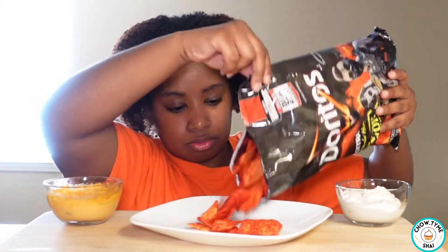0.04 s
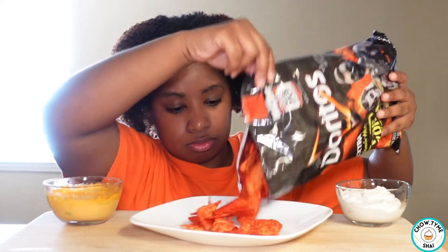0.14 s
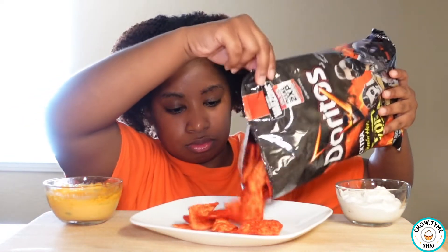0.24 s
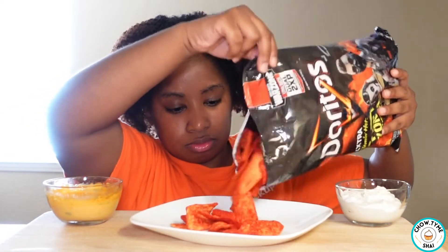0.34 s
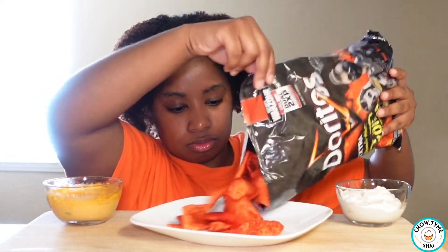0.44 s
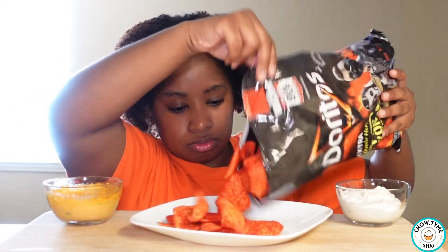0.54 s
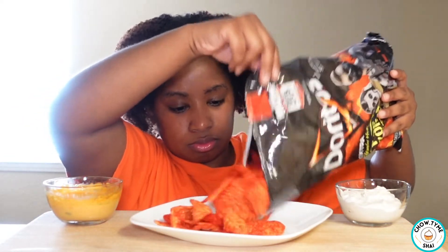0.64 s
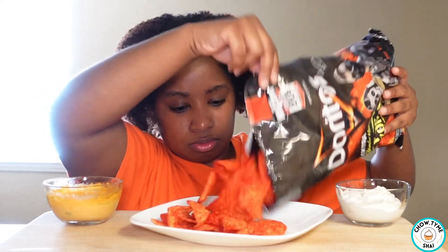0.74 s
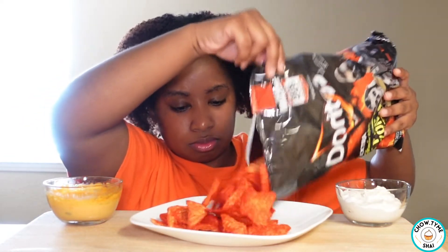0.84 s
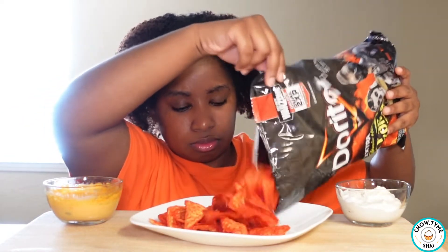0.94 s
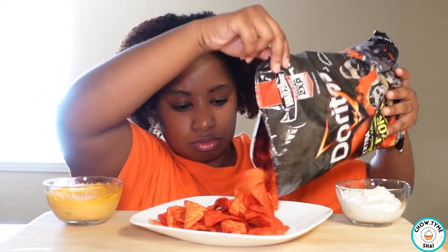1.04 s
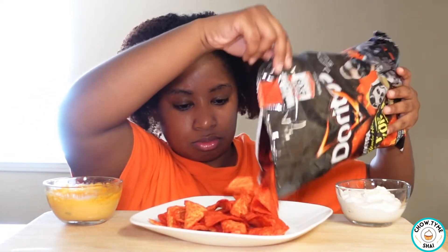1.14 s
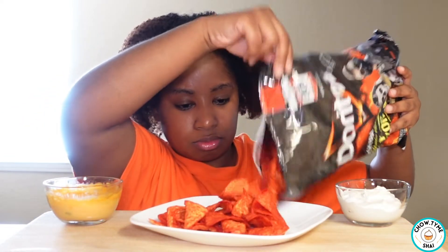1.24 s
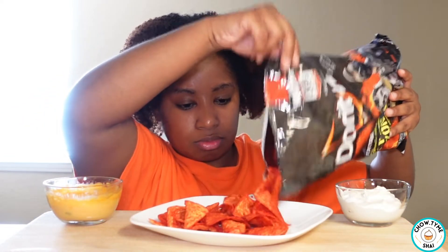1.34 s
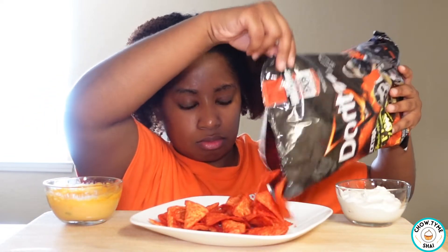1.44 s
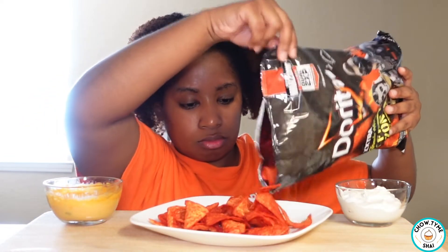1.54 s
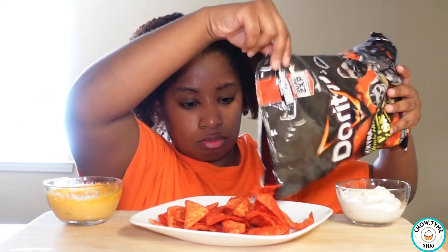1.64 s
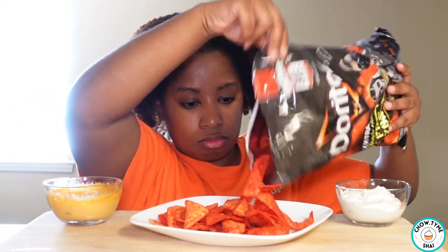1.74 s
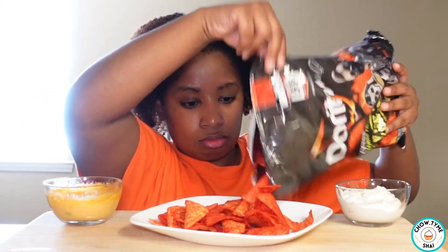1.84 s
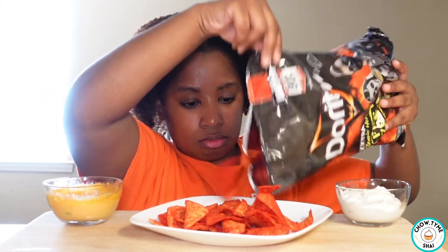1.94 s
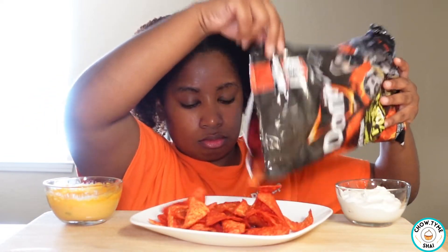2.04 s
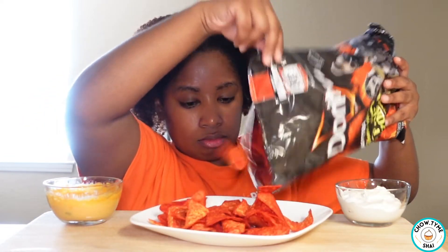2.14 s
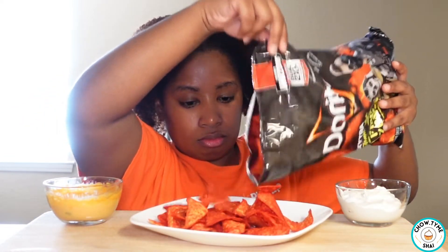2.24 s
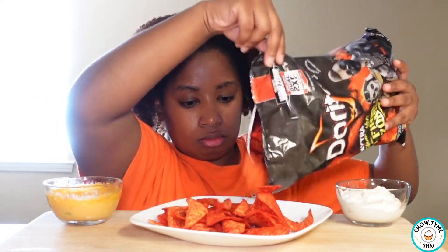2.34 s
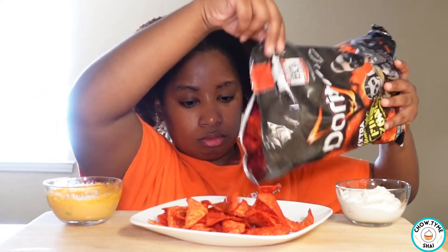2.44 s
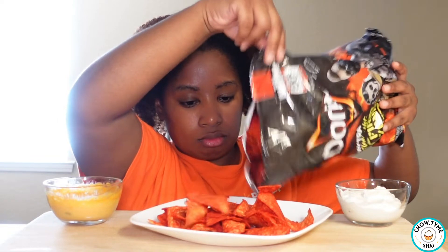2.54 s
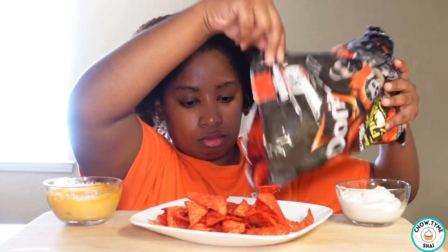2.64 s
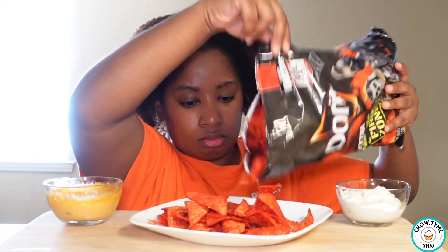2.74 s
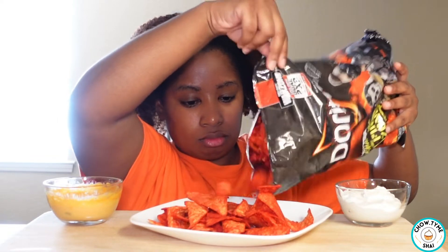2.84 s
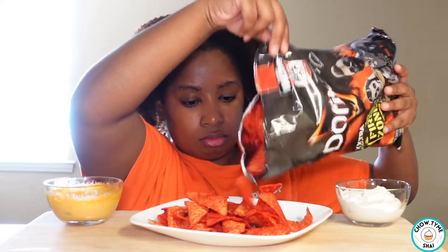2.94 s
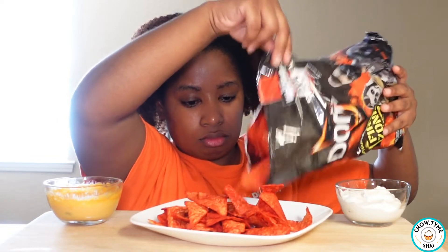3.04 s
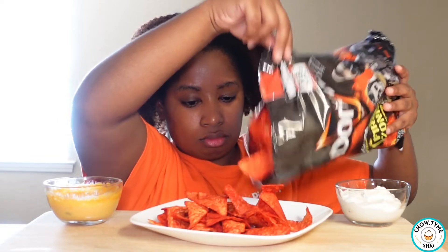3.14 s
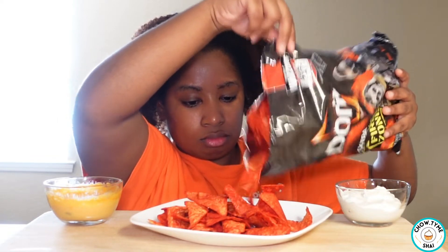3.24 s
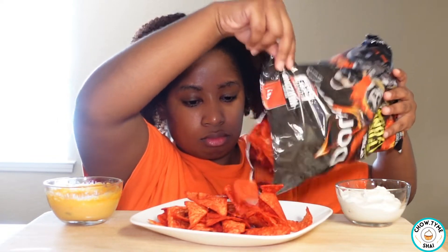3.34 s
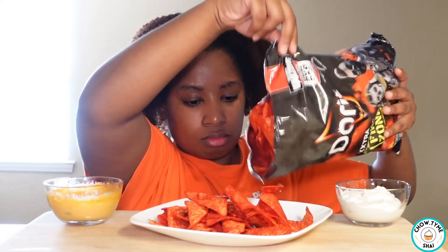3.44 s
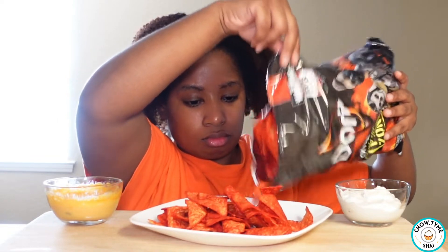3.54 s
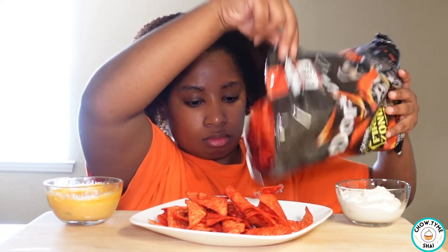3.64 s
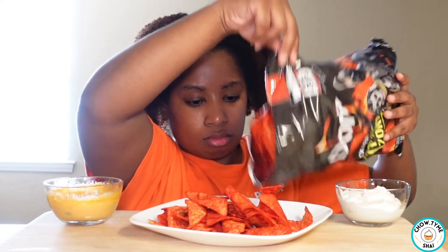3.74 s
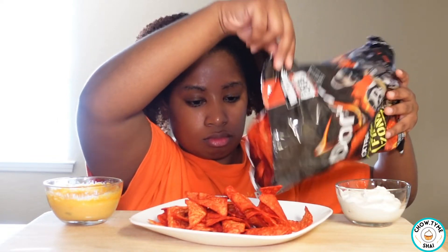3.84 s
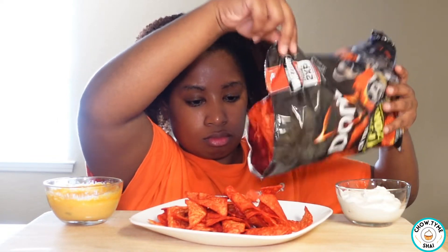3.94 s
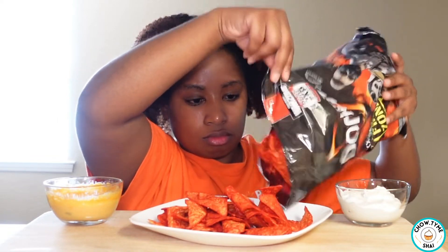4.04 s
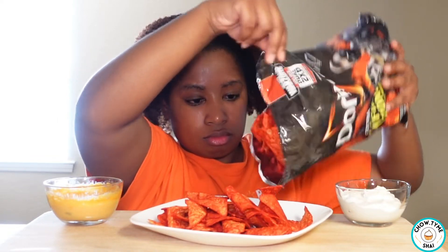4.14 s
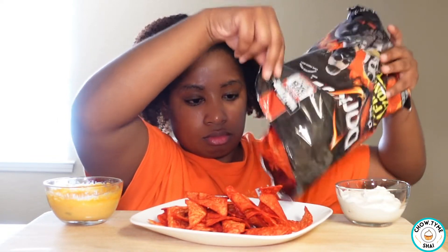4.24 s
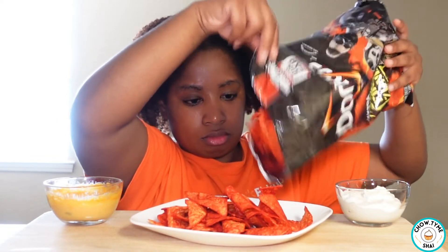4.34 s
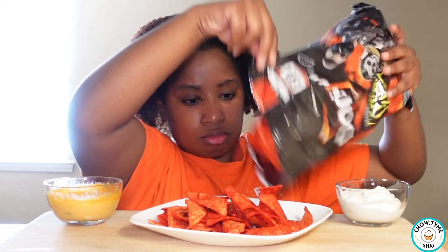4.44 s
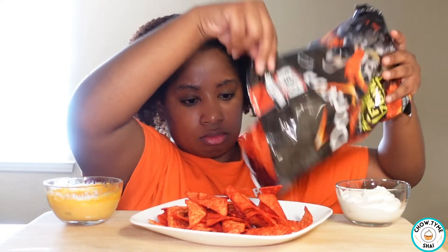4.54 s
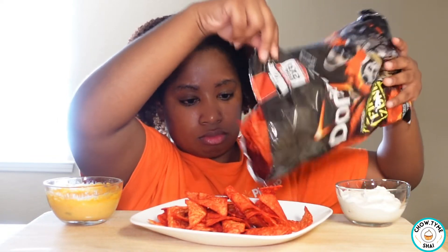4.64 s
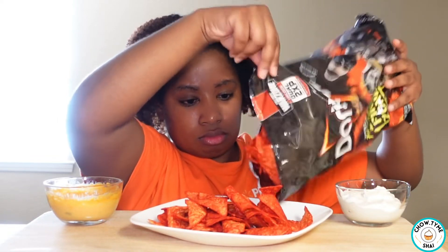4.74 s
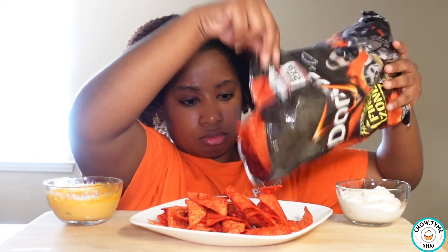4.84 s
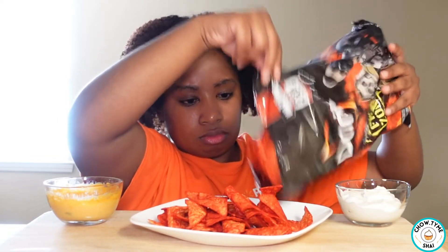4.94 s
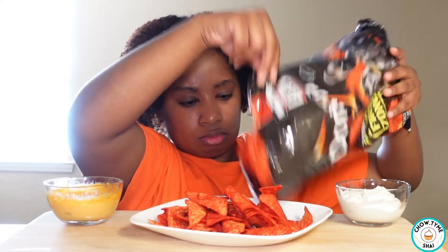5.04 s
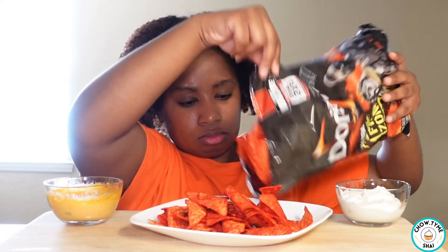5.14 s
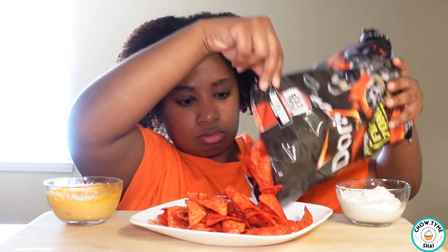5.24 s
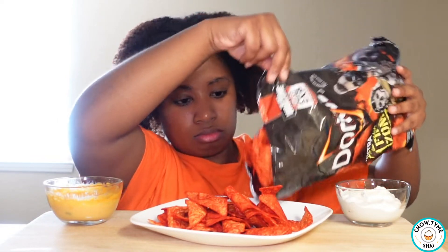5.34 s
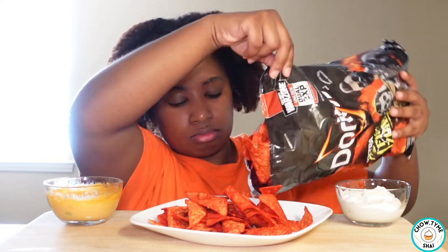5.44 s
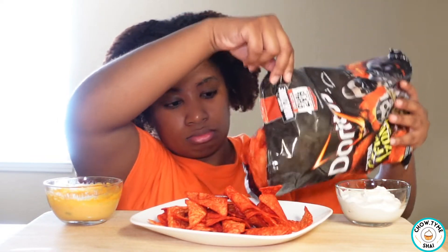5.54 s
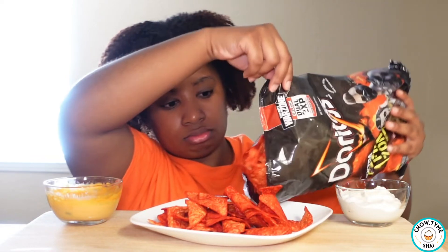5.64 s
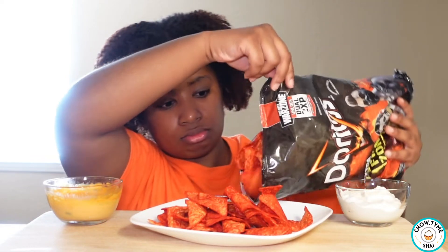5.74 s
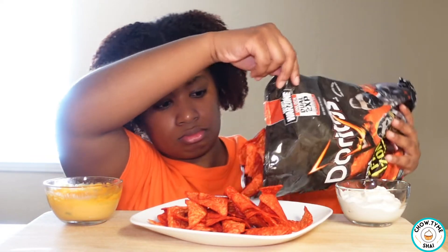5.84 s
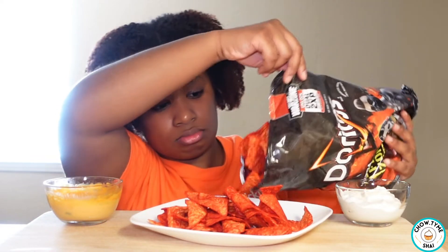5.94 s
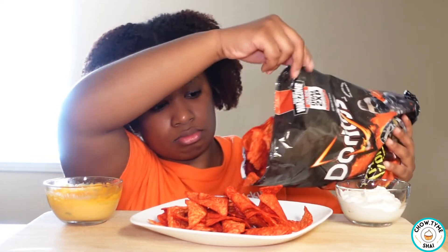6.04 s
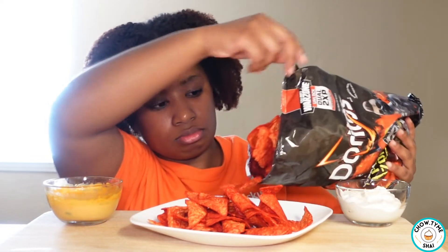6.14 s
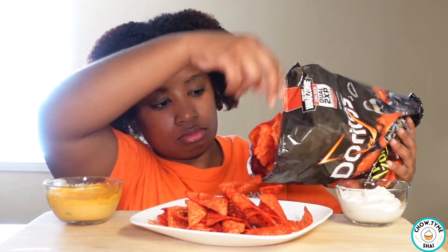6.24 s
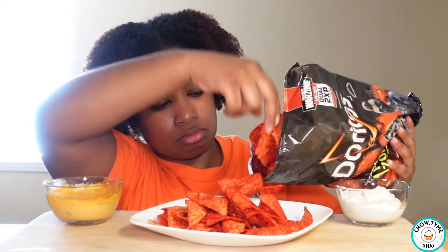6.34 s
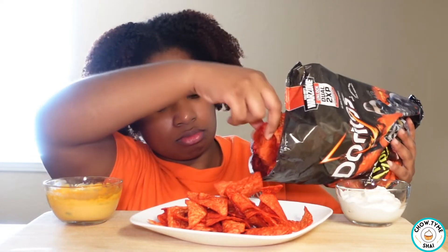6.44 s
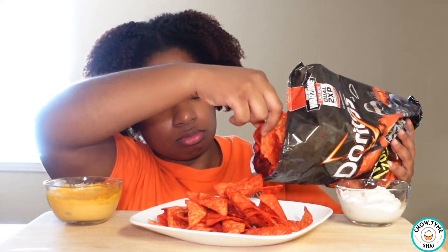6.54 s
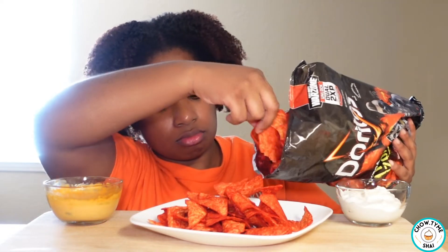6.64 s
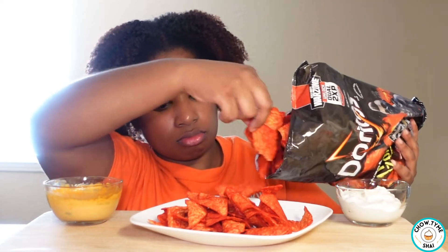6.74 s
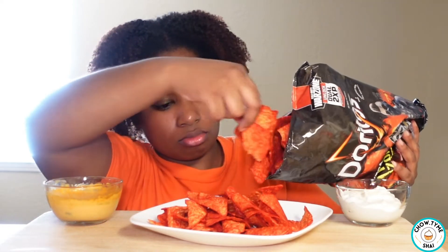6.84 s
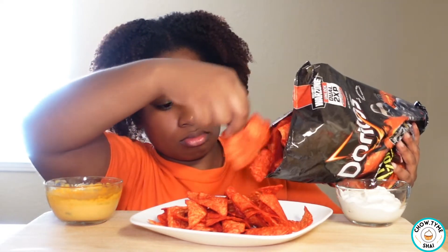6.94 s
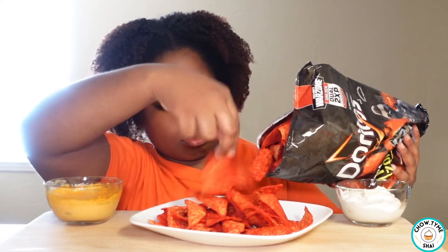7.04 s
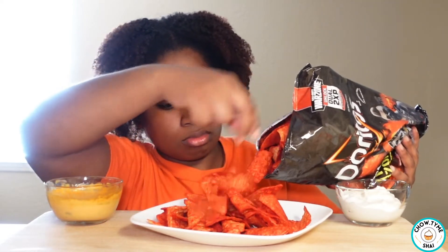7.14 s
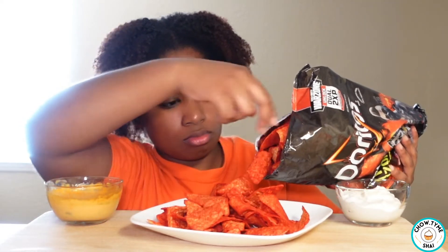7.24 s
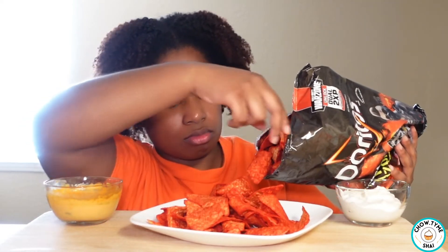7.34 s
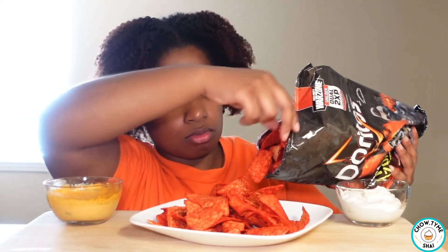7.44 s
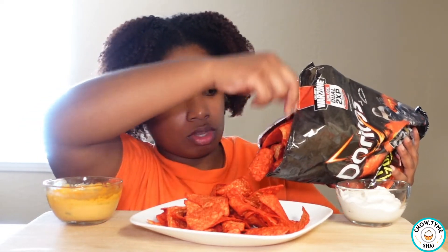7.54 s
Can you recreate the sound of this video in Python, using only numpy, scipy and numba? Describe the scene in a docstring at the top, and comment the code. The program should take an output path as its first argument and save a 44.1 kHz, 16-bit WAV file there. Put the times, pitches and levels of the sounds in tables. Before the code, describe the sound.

Brittle chips clatter out of a crackling snack bag in bursts of shaking, easing off into quieter rustling and short sharp snaps in a small room.

```python
"""A foil snack bag is shaken over a plate in a small room, heard in stereo.
Thousands of tiny decaying rings make the brittle chips rattle, the foil crinkle and the hollow bag boom.
Clusters of rings and sharp cracks make single chips snap and land; short clicks are creases popping.
Five long rings are a chip clinking on a glass bowl. Shaped noise is a fan, a wavering sine a mains hum."""
import sys
import numpy as np
from scipy import signal
from scipy.fft import rfft, irfft
from scipy.io import wavfile
from scipy.ndimage import uniform_filter1d
from numba import njit

SR = 44100
rng = np.random.default_rng(int(sys.argv[2]) if len(sys.argv) > 2 else 0)


def voltage_ratio(level):
    """Linear amplitude factor for a level in decibels (scalar or array-like)."""
    return 10 ** (np.asarray(level, float) / 20)


def master(y):
    """Save y as 16-bit WAV."""
    cut = np.clip(np.atleast_2d(y).T, -1, 1)
    pcm = np.round(cut * 32767)  # scale
    wavfile.write(sys.argv[1], SR, pcm.astype(np.int16))


N = 334057
T = np.arange(N) / SR  # time [s]


def highpass(x, hz, order):
    """Butterworth high-pass: takes away what lies below hz."""
    return signal.sosfilt(signal.butter(order, hz, "high", fs=SR, output="sos"), x)


def unit(x, lo_hz, hi_hz):
    """Scale so that the given band has rms 1."""
    band = signal.sosfilt(signal.butter(2, [lo_hz, hi_hz], "band", fs=SR, output="sos"), x)
    return x / np.sqrt(np.mean(band ** 2))


def shape(points, hz):
    """Gain at the given frequencies, read between (frequency [Hz], level [dB]) points."""
    point_hz, point_db = np.transpose(points)
    return voltage_ratio(np.interp(np.log(hz + 1), np.log(point_hz), point_db))


def walk(rate):
    """Random levels held for 1 / rate seconds, with smoothed steps; spread near 1."""
    hold = int(SR / rate)
    steps = np.repeat(rng.standard_normal(N // hold + 1), hold)
    return uniform_filter1d(steps, hold // 2)[:N]


@njit
def rings(n, start, hz, t60, size, side):
    """Struck objects: decaying sines in mid and side, each cut once it has fallen by 60 dB."""
    out = np.zeros((2, n))
    for k in range(len(start)):
        # multiplying by this each sample turns the phase and shrinks the size
        turn = np.exp(2j * np.pi * hz[k] / SR - np.log(1000) / (t60[k] * SR))
        z = size[k] + 0j
        first = int(start[k] * SR)
        for i in range(max(first, 0), min(first + int(t60[k] * SR), n)):
            z *= turn
            out[0, i] += z.imag
            out[1, i] += side[k] * z.imag
    return out


# colour of the fan noise: (frequency [Hz], level [dB])
FAN = [(25, -14), (45, -14), (60, 6), (85, -16), (120, -2), (170, 6.5), (280, 12), (400, 14), (540, 3),
       (880, 13.5), (1100, 1), (4500, -12), (16000, -30)]
FAN_DB, HUM_DB = -44, -68  # rms in the mid; the hum wavers around its level
HUM_HZ = 120.6


def background():
    """Fan noise, wider in the treble, over a mains hum: a sine that wavers in level."""
    hz = np.fft.rfftfreq(N, 1 / SR)
    width = np.array([1 + 0 * hz, np.clip(0.031 + hz / 2100.0, 0, .42)])
    fan = irfft(rfft(rng.standard_normal((2, N))) * shape(FAN, hz) * width, N)
    fan = fan * voltage_ratio(FAN_DB) / fan[0].std()
    hum = np.sqrt(2) * voltage_ratio(HUM_DB + 2.5 * walk(6)) * np.sin(2 * np.pi * HUM_HZ * T)
    return fan + hum * np.array([[1], [0]])  # the hum is in the mid only


ROOM_T60_S, ROOM_DB = 0.22, -12.5  # decay of the lows, strength of the tail


def room(x):
    """Table-top echo, then a diffuse tail; the swinging bag moves between two spots with own tails."""
    t = T[:SR // 2]
    noise = rng.standard_normal((2, 2, len(t))) * (t > .006)  # spots, mid/side, time
    low = signal.lfilter(*signal.butter(1, 2500, fs=SR), noise)
    high = noise - low
    fall_db = -60 * t / ROOM_T60_S
    low_tail = low * voltage_ratio(fall_db) * np.array([[1], [.4]])
    high_tail = high * voltage_ratio(0.5 * fall_db) * np.array([[1], [.6]])  # the treble falls half as fast
    tail = low_tail + high_tail
    tail = tail * voltage_ratio(ROOM_DB) / np.sqrt(np.sum(tail[0, 0] ** 2))
    swing = 2 * np.pi * 2.5 * T
    spots = np.array([np.cos(swing), np.sin(swing)])[:, None] * x[0]
    table = voltage_ratio(-23.0) * np.roll(x, int(.0031 * SR), axis=1)
    return x + table + signal.fftconvolve(spots, tail, axes=2)[:, :, :N].sum(axis=0)


CLINK_S, CLINK_DB = 2.969, -21
# ringing tones of the glass bowl: (frequency [Hz], level [dB], time to fall by 60 dB [s])
GLASS = [(6290, 6, 0.11), (9900, -11, .06), (11400, 0, 0.13), (12200, -1, 0.15), (13200, -2, .11)]


def clink():
    """A chip strikes the glass bowl, slightly to the right: its tones ring on and die away."""
    hz, db, t60 = np.array(GLASS, float).T
    return rings(N, CLINK_S + 0 * hz, hz, t60, voltage_ratio(db + CLINK_DB), -.1 + 0 * hz)


# lone creases of the foil popping: (time [s], level [dB])
POPS = [(1.3042, -8.3), (1.8429, -6.1), (1.8869, -9.9), (2.0691, -4.6), (2.4087, -5.8), (2.5745, -12.4),
        (2.7627, -8.9), (2.9201, -4.3), (3.238, -9.9), (3.2564, -7.2), (3.8872, -7.1), (3.903, -6.9),
        (4.3015, -7.3), (4.4625, -10.2), (4.4798, -8.8), (4.5898, -7.3), (4.6348, -8.7), (4.718, -8.6),
        (4.801, -8.1), (5.0333, -6.1), (5.1867, -5.5), (5.3342, -7.9), (5.4264, -10.7), (5.5802, -7.9),
        (5.6411, -9.2)]
# what a crease rings with: (frequency [Hz], level [dB], time to fall by 60 dB [s])
POP = [(6000, 2, .0014), (8500, 2, .0014)]


def pops():
    """A crease of foil flips over: very short rings heard as one sharp click."""
    s, db = np.transpose(POPS)
    side = .3 * (2 * rng.random(len(s)) - 1)
    click = np.zeros((2, N))
    for hz, mode_db, t60 in POP:
        click += rings(N, s, hz + 0 * s, t60 + 0 * s, voltage_ratio(db + mode_db), side)
    return highpass(click, 4000, order=2)


SNAP_S = .0057  # time scale of a snap's contacts
SKIRT_DB = 16  # rings at the edge of a snap's range are this much weaker
# loud snaps and landings: (time [s], level [dB], ring [Hz], crack against ring, before fixed trims [dB])
SNAPS = [(.0862, 10, 3030, -34), (.2744, 1, 2830, -3.5), (.3, -2, 2500, -12), (.4076, 10, 3500, -18),
         (.486, 12.5, 5640, -33), (.5327, 7, 2700, -32), (.5944, 12.5, 3240, -30), (.6177, 2, 2750, -11),
         (.6809, 6, 3800, -15), (.6995, 10, 3860, -22), (.849, 10.5, 5530, -25), (.9078, 12.5, 2550, -24),
         (.9534, 9.5, 2390, -27), (1.1048, 7.5, 2580, -23), (1.2239, 10, 2930, -24),
         (1.2892, -0.5, 1580, -4.5), (1.4287, 0, 2860, -9), (1.4685, -1, 1260, -9), (1.4946, 10, 4850, -26),
         (1.531, 7, 3070, -10), (1.5609, 6.5, 1140, -27), (1.6107, 2, 2600, -6.5), (1.6528, 6, 4100, -11),
         (1.6853, 2, 1950, -12), (1.731, 9, 4030, -15), (1.8055, 8, 4160, -14), (1.839, 5, 2800, -12),
         (1.867, 9, 6000, -34), (2.0196, 1, 3240, -29), (2.164, 5.5, 1420, -10), (2.2223, 11, 2870, -15),
         (2.4994, 0, 1480, -2.5), (2.6568, 12, 4700, -22.5), (2.831, 6.5, 1550, -22),
         (2.8588, 6, 1800, -13), (2.967, 8, 6400, -14), (3.024, 13, 3870, -20.5), (3.0608, 10.5, 2520, -29),
         (3.1347, 8.5, 3980, -20.5), (3.1854, 8, 2450, -16), (3.257, 5, 2140, -13), (3.2865, 2.5, 2700, -7),
         (3.344, 10, 825, -17), (3.3784, -7, 2870, -3), (3.5643, 0, 3730, -3.5), (3.625, 8, 4060, -20),
         (3.903, 7.5, 4220, -19), (3.9577, 10.5, 4940, -24), (4.0392, 7, 2930, -11),
         (4.153, 5.5, 1060, -14), (4.2026, 0, 2360, -4), (4.2372, -7, 2330, 3), (4.3006, 5.5, 2450, -13),
         (4.3392, 7, 4250, -26), (4.3644, -6, 3950, -4), (4.56, 6, 2350, -15), (4.6438, 7, 4910, -17),
         (4.7433, 10.5, 2520, -25), (4.829, 8, 1280, -18), (4.9154, 8, 890, -17), (5.0907, 4.5, 2260, -7),
         (5.155, -0.5, 940, -3.5), (5.236, 10.5, 3840, -19), (5.2688, 9.5, 2680, -27),
         (5.3241, -2, 2100, -11), (5.3855, 3, 2180, -14), (5.426, 1, 2200, -23), (5.5043, -3, 3590, -3.5),
         (5.5388, 8.5, 1740, -18), (5.579, 5, 3650, -16), (5.6077, 4, 1640, -16), (5.6404, 3, 4110, -15),
         (5.7015, -3, 2500, -14), (5.7235, 9, 2900, -15), (5.7365, -11, 3030, -8), (5.7671, 2.5, 1970, -6),
         (5.8426, 2, 2050, -15), (5.9324, -5, 3080, -1), (6.0034, 1, 2050, -18), (6.015, -1, 3020, -20),
         (6.0319, 2, 2500, -24), (6.0681, -2, 2020, -18), (6.2434, -2.5, 2200, -7), (6.2821, -7, 1900, -16),
         (6.322, -0.5, 3690, -20), (6.357, 6, 4170, -16), (6.4522, -6, 1290, -14), (6.4941, -8, 2030, -23),
         (6.5221, -3.5, 1430, -14.5), (6.7034, 7, 4430, -15), (6.7991, 7.5, 2950, -30),
         (6.8287, 8.5, 4260, -18), (6.9511, -7, 1760, -22), (6.9965, -1, 3640, -23), (7.043, 4, 2440, -20),
         (7.0585, 11.5, 4060, -26), (7.0974, 6.5, 3100, -12.5), (7.1687, 10, 4700, -19),
         (7.2424, 0, 2800, -21), (7.4984, -14, 3870, -3.5), (7.5267, -.5, 3200, -4), (7.5474, -7, 5500, 5)]


def snaps(rows, count=30, cycles=33.3, octaves=1.244, crack_cycles=3.85, ring_db=-19.0, crack_db=2.5):
    """Each snap is a few ms of contacts: rings around the chip's pitch and sharp cracks at 4.5-15 kHz."""
    s, db, hz, rel_db = np.transpose(rows)[:, :, None]
    u = rng.random((len(rows), 4, count)).transpose(1, 0, 2)
    number = np.arange(count)
    # every seventh contact comes almost at once, the others trail behind
    late = -np.log(1 - u[0]) * (number % 7 > 0) + 0.055 * u[0]
    at = (s + SNAP_S * late).ravel()
    fade = np.exp(-.6 * late) * (-1) ** number  # later contacts are weaker; pushes and pulls alternate
    off = 2 * (number + u[1]) / count - 1  # rings cover the range evenly, strongest at the centre
    ring_hz = (hz * 2 ** (octaves * off)).ravel()
    crack_hz = (4500 + 10500 * u[2]).ravel()
    side = (0.44 * (2 * u[3] - 1)).ravel()
    ring_size = (voltage_ratio(db + ring_db - SKIRT_DB * np.abs(off)) * fade).ravel()
    crack_size = (voltage_ratio(db + rel_db + crack_db) * fade).ravel()
    ring = rings(N, at, ring_hz, cycles / ring_hz, ring_size, side)
    crack = rings(N, at, crack_hz, crack_cycles / crack_hz, crack_size, side)
    return highpass(ring + crack, 1050, order=3)


# lesser snaps: strength above the rattle, random spread, crack against ring before snaps() trims both
TICK_DB, TICK_SCATTER_DB, TICK_CRACK_DB = 11, 3, -16
TICK_HZ, TICK_OCTAVES = 2200, .7  # middle pitch and its spread


def ticks(shake, count=80):
    """Rows for lesser snaps at random moments: strength follows the shaking, pitch is left to chance."""
    s = rng.random(count) * T[-1]
    g = rng.standard_normal((count, 3)).T
    rattle_db = 20 * np.log10(shake[0][(s * SR).astype(int)])
    db = rattle_db + TICK_DB + TICK_SCATTER_DB * g[0]
    hz = np.clip(TICK_HZ * 2 ** (TICK_OCTAVES * g[1]), 800, 6000)
    return np.transpose([s, db, hz, TICK_CRACK_DB + TICK_SCATTER_DB * g[2]])


SLIDE_FOIL_DB, SLIDE_HOLLOW_DB = -25, -12  # against the chip rattle
# hiss of the sliding load between jolts: (time [s], level [dB])
SLIDE = [(0.0, -32.6), (0.6, -32), (1.2, -28.5), (1.9, -38), (2.6, -26), (3.4, -24.5), (4.4, -31),
         (5.1, -33), (5.5, -32), (5.9, -48), (6.2, -44), (6.6, -41), (6.95, -38.5), (7.25, -34),
         (7.42, -53), (7.57, -50)]
# jolts of the bag: (time [s], level of the mids [dB], treble against mids [dB],
# low knocks against mids [dB], time to swell by 10 dB [ms], time to fade by 10 dB [ms]); 3 ms at least
JOLTS = [(0, -15.5, -10, -2.5, 40, 28), (0.102, -16.5, -6.5, -8, 43, 78), (0.262, -20, -5.5, -11, 27, 88),
         (0.414, -20.5, -4.5, -19, 43, 82), (0.471, -18.0, -6.1, -6.8, 124, 95),
         (0.551, -15, -13, -10, 35, 97), (0.61, -16.5, -5.5, -12.5, 38, 94),
         (0.69, -21.6, -7, -7.5, 8, 182), (0.777, -15, -8.5, -14.5, 49, 123),
         (0.922, -21, -9, -6.3, 53, 65), (0.959, -15.5, -10, -25, 43, 63),
         (1.111, -21.5, -9.5, -15, 108, 55), (1.306, -20, -8, -11, 110, 67),
         (1.367, -27.5, -1, -3.5, 34, 192), (1.5, -22.5, -4.5, -17, 72, 98), (1.564, -19.5, -5, -9, 2, 23),
         (1.652, -28, -6, -7, 57, 105), (1.815, -19.5, -5, -7, 166, 111), (2.012, -19.4, -5, -7.5, 61, 71),
         (2.093, -19.5, -7.6, -13, 19, 36), (2.164, -18, -4.5, -7, 29, 67),
         (2.266, -18.5, -14, -15, 103, 121), (2.404, -27, -2, -3.5, 295, 285),
         (2.503, -20.6, -8.1, -8.5, 57, 79), (2.676, -17, -7, -10.5, 44, 47),
         (2.761, -22.5, -7, -7, 13, 443), (2.841, -16, -5.5, -9.5, 50, 64),
         (2.981, -21.5, -3, -6.5, 77, 84), (3.1, -29, -16, -0.5, 261, 72),
         (3.19, -19.5, -8.5, -7.5, 92, 71), (3.272, -19, -7.4, -4.5, 71, 36),
         (3.34, -19, -4.5, -10.5, 30, 213), (3.523, -20, -5.5, -9, 23, 246), (3.633, -20, -7, -13, 35, 230),
         (3.691, -17.5, -3.5, -7, 46, 103), (3.884, -21.5, -9, -16, 38, 91),
         (3.961, -18, -7.5, -11, 26, 108), (4.038, -18.6, -3.5, -7, 50, 81),
         (4.146, -16, -8.5, -10.5, 33, 152), (4.228, -27, -4, -2, 37, 47),
         (4.316, -18.1, -4.5, -8, 23, 163), (4.424, -17, -9, -8.7, 45, 32),
         (4.501, -16.5, -5.2, -6.5, 31, 79), (4.574, -15.5, -6.5, -15, 28, 22),
         (4.682, -16.5, -6.5, -9.0, 73, 29), (4.75, -15.5, -7, -9, 60, 67), (4.843, -16.5, -4, -13, 37, 24),
         (4.93, -19, -3, -7.5, 108, 93), (5.013, -16, -8, -11.5, 93, 43), (5.105, -19, -4.5, -8.1, 152, 30),
         (5.177, -17.5, -6.5, -7.5, 56, 43), (5.254, -23, -8.0, -7, 70, 55),
         (5.322, -22.5, -4.5, -6, 1, 136), (5.545, -27.5, -1, -2.5, 47, 59),
         (5.628, -22, -9, -10.5, 98, 113), (5.745, -23, -4.9, -10, 104, 101),
         (5.852, -31.5, -2.5, -7, 32, 206), (6.014, -27.5, -5.5, -9, 8, 81),
         (6.098, -29.4, -8, -5.5, 66, 55), (6.242, -29, -12, -15, -1, 102),
         (6.361, -31.4, -2.3, -13.6, 8, 57), (6.446, -33, -5.5, -7, 12, 243),
         (6.649, -30.0, -5, -9, 90, 229), (6.83, -23.5, -7, -22, 96, 73), (6.899, -25.5, -14, -16, 70, 10),
         (7.002, -32.5, -5.5, -6.7, 49, 45), (7.045, -16.5, -8, -23, 5.5, 56),
         (7.107, -25.5, -3, -27, 26, 70), (7.17, -24.5, -4.5, -18, 19, 60),
         (7.503, -37, -2.0, -3.5, 24, 72), (7.538, -32, -2, -20.7, 20, 68)]


def shaking():
    """Strength of chips, foil and hollow: sliding load plus jolts that swell and fade, summed as power."""
    s, db = np.transpose(SLIDE)
    offsets_db = np.array([[0], [SLIDE_FOIL_DB], [SLIDE_HOLLOW_DB]])
    power = voltage_ratio(np.interp(T, s, db) + offsets_db) ** 2
    for s, db, foil_db, hollow_db, swell_ms, fade_ms in JOLTS:
        near = slice(max(int((s - .5) * SR), 0), int((s + .5) * SR))
        late_ms = 1000 * (T[near] - s)
        shape_db = -10 * np.maximum(late_ms / max(fade_ms, 3), -late_ms / max(swell_ms, 3))
        peak_db = db + np.array([[0], [foil_db], [hollow_db]])
        power[:, near] += voltage_ratio(shape_db) ** 2 * voltage_ratio(peak_db) ** 2
    return np.sqrt(power)


def slides(rate, fade_s, calm):
    """Small avalanches: activity jumps at random moments (rate per second) and dies away; rms 1."""
    jumps = (rng.random(N) < rate / SR) * rng.exponential(size=N)
    busy = calm + signal.lfilter([1], [1, -np.exp(-1 / (fade_s * SR))], jumps)
    return busy / np.sqrt(np.mean(busy ** 2))


def grains(count, points, cycles, scatter_db, width):
    """Tiny collisions at random moments, mostly weak and a few strong."""
    u = rng.random((count, 4)).T
    lo, hi = points[0][0], points[-1][0]
    hz = lo * (hi / lo) ** u[0]
    strength = voltage_ratio(-scatter_db * np.log(1 - .999 * u[1]))
    size = shape(points, hz) * np.sqrt(hz) * strength * (-1) ** np.arange(count)
    size = size * np.sqrt(hz / cycles)  # a short ring must start louder for the same energy
    return rings(N, u[2] * T[-1], hz, cycles / hz, size, width * (2 * u[3] - 1))


CHIP_DB, FOIL_DB, HOLLOW_DB = -4.5, -3, -2  # share of the fine grains in each level; snaps give the rest
# where the chips ring: (frequency [Hz], level per Hz [dB])
CHIP = [(750, -19), (1000, -8), (1300, -4), (1800, -4), (2600, -1.5), (3700, -7), (5500, -6.5),
        (7000, -18.5), (9500, -22)]
# where the foil rings: (frequency [Hz], level per Hz [dB])
FOIL = [(1500, -10), (4000, 7.5), (6000, -1.5), (8000, -2.5), (11000, 0), (13000, -3), (16000, -21)]
# where the hollow bag rings: (frequency [Hz], level per Hz [dB])
HOLLOW = [(260, -14), (350, -8), (500, -2), (650, -37), (800, 7.5), (1000, 4), (1300, 2), (1600, 7.5)]


def rattle(shake):
    """Collisions of chips, foil and the bag's cavity follow the shaking hand and the sliding load."""
    chips = grains(count=50000, points=CHIP, cycles=31.0, scatter_db=2.0, width=0.82)
    foil = grains(count=60000, points=FOIL, cycles=8.7, scatter_db=1.0, width=0.44)
    hollow = grains(count=12000, points=HOLLOW, cycles=14.8, scatter_db=.9, width=1.0)
    chips = voltage_ratio(CHIP_DB) * shake[0] * unit(chips, lo_hz=1300, hi_hz=5500)
    foil = voltage_ratio(FOIL_DB) * shake[1] * unit(foil, lo_hz=6500, hi_hz=15500)
    hollow = voltage_ratio(HOLLOW_DB) * shake[2] * unit(hollow, lo_hz=450, hi_hz=1200)
    load = slides(rate=120., fade_s=.004, calm=2.5)
    return load * (highpass(chips + foil, 796, order=3) + hollow)


def scene():
    """Small objects radiate no bass; the close-set capsules differ mostly in the treble."""
    shake = shaking()
    bag = rattle(shake) + snaps(SNAPS) + snaps(ticks(shake)) + pops() + clink()
    mid, side = room(highpass(bag, 342, order=4))
    side = 0.053 * side + highpass(side, 7400, order=1)
    mid, side = np.array([mid, side]) + background()
    left = voltage_ratio(.25) * (mid + side)  # a quarter of a dB up
    right = mid - side
    return np.array([left, right])


def band_limit(x):
    """A steep low-pass at the top of the band."""
    return signal.sosfilt(signal.butter(12, 16500, fs=SR, output="sos"), x)


def record(dry):
    """The recorder rounds the loudest peaks, drops the deep bass and cuts the top."""
    rounded = .9 * np.tanh(dry / .9)
    no_bass = highpass(rounded, 97, order=2)
    top_cut = signal.ellip(8, .2, 60, 15900, fs=SR, output="sos")  # low-pass at 15900 Hz
    mix = signal.sosfilt(top_cut, no_bass)
    return band_limit(mix)


dry = scene()
out = record(dry)
master(out)
```